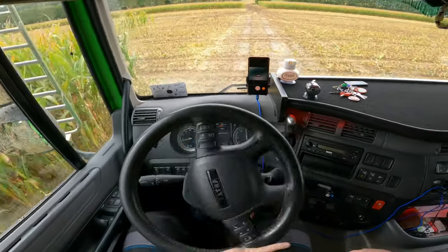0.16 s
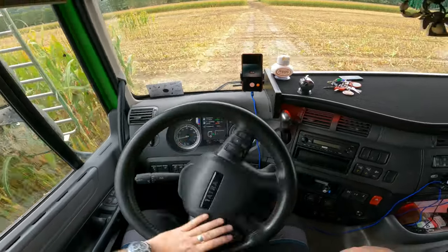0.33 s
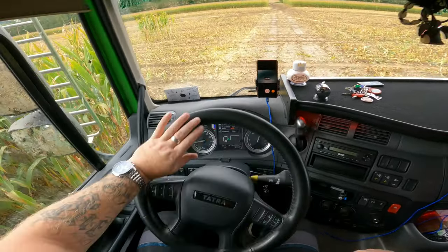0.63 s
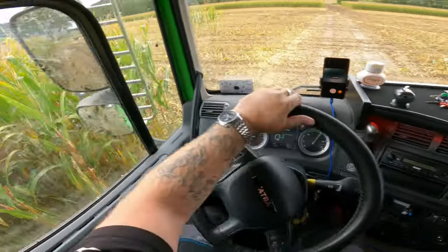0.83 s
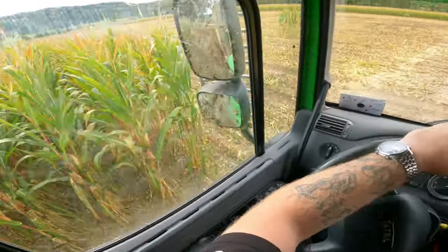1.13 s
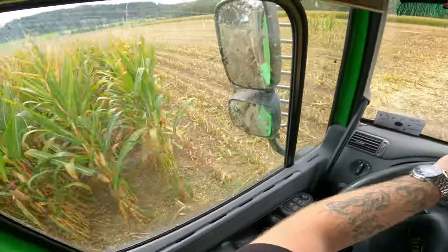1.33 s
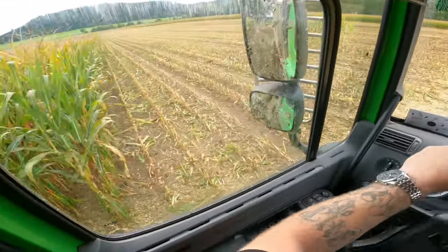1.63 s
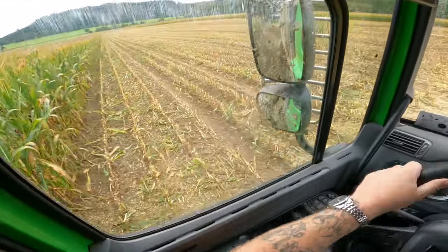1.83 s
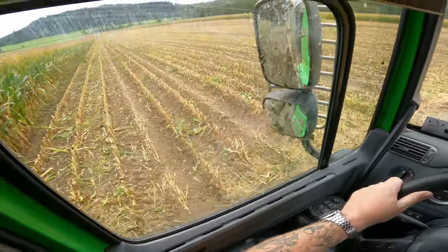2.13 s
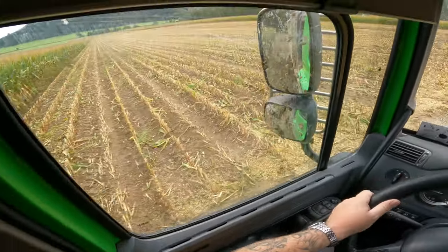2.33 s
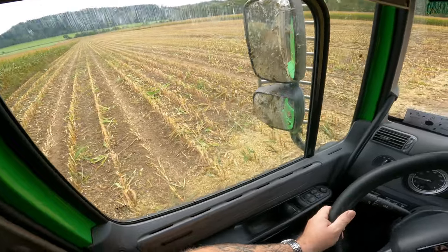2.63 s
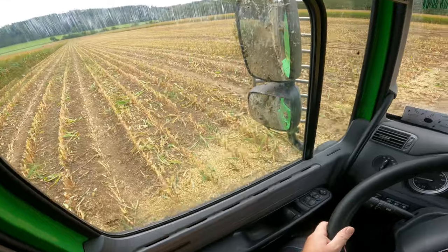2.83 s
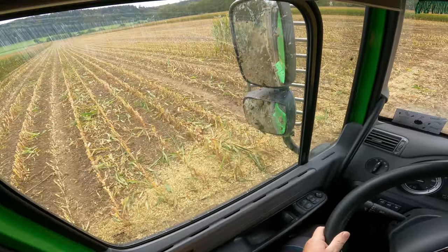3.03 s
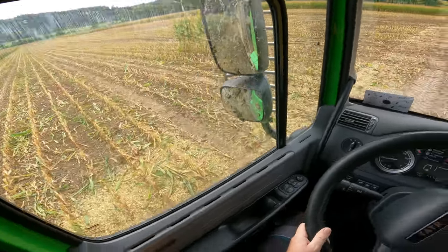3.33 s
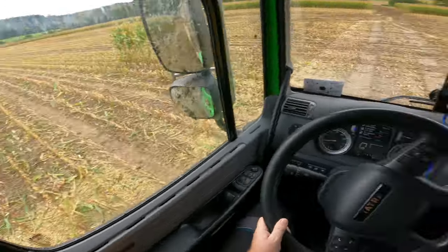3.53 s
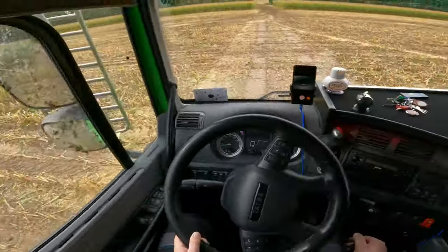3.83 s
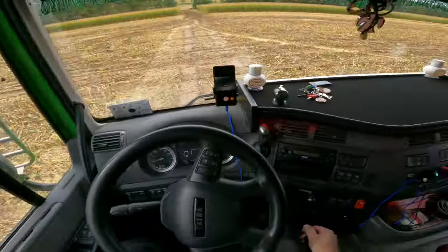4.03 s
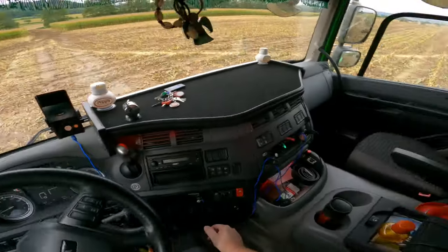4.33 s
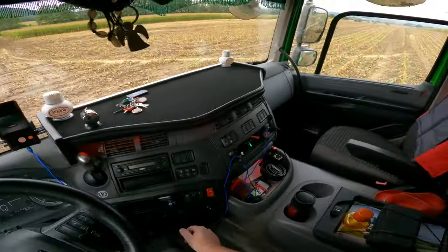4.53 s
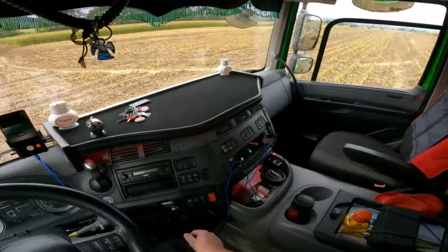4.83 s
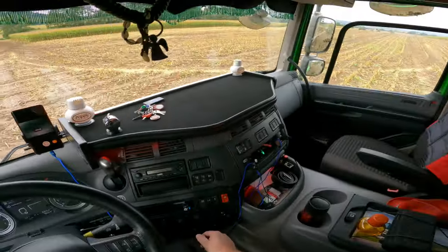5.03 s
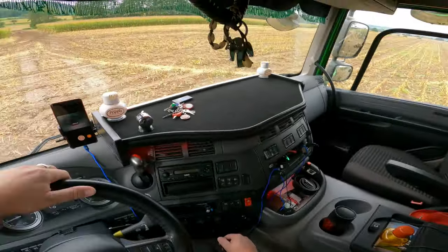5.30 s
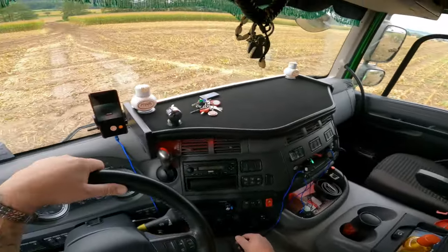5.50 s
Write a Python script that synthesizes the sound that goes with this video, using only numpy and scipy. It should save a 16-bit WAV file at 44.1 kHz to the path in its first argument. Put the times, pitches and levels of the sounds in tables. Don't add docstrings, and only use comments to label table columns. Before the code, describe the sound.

Heard at the driver's head in a closed truck cab: a hard knock and air-valve snap, a short fading hiss, then a six-cylinder diesel climbing under load. Around two seconds it drops for a gear change, wavers with thuds and knocks, and settles lower and softer. Field bumps boom through the cab while trim ticks and loose metal faintly rings.

```python
import sys
import numpy as np
from scipy import signal
from scipy.fft import rfft, irfft, next_fast_len
from scipy.io import wavfile
from scipy.ndimage import uniform_filter1d, minimum_filter1d

SR = 44100
rng = np.random.default_rng(int(sys.argv[2]) if len(sys.argv) > 2 else 0)


def boost(x):
    u = np.asarray(x, float) / 20
    return 10 ** u


def to_wav(sig):
    pcm = np.clip(np.atleast_2d(sig), -1, 1) * 32767
    pcm = np.round(pcm).astype(np.int16)
    wavfile.write(sys.argv[1], SR, pcm.T)


N = 249606

# t/s, firings per second [1/s]
SPEED = [(0, 67), (.35, 69), (.55, 78), (.75, 82), (1.3, 87.8), (1.6, 89.3), (1.87, 93.2), (2.1, 92.8),
         (2.3, 67), (2.75, 64), (3.0, 57), (3.3, 68.5), (3.65, 63.5), (3.95, 67.5), (4.15, 58),
         (4.75, 73.5), (5.3, 75.5), (5.66, 80)]
# t/s, level under full pull/dB
LOAD = [(0, -8.5), (.3, -8.5), (.6, -10.5), (.9, -10), (1.3, -6), (1.95, -6), (2.1, -8), (2.25, -15.5),
        (2.8, -13), (3.9, -19), (4.2, -20.5), (4.55, -18.5), (4.72, -17.5), (5.66, -20)]
# t/s, level/dB
TRAVEL = [(0, 1), (.9, -0.1), (1.32, -2), (1.53, -1), (2.0, 1), (2.22, -1), (2.33, -4.5), (2.57, -4.5),
          (2.75, -9), (3.17, -6.5), (3.4, -6), (3.86, -5), (4.24, -3), (4.6, -0.5), (5.28, -3),
          (5.66, -0.5)]
ORDERS = [2, 4, 5, 7, 8, 9, 10, 11, 12, 13, 14, 15, 16, 17, 18, 19, 20, 22, 24, 26, 28, 32, 34, 36, 40, 42]
ORDER_LEVELS = [-31.5, -38.5, -37, -40.5, -34, -37, -37.5, -33, -32.5, -48.5, -33, -42, -32, -41.5, -36,
                -40.5, -43.5, -39.5, -49, -41, -51.5, -47.5, -45.5, -50.5, -46.5, -50.5]
# f/Hz, width/Hz, lift/dB
PANELS = [(73.4, 18, 11.5), (110, 9.8, 12), (135.8, 1, 6), (150.6, 11, 7.5), (168.3, 12, 9),
          (209.4, 15, 9.5), (260, 30, 9)]
# t/s, multiple [1], peak level/dB, half length/s
SINGING_ORDERS = [(0.63, 8, -26, 0.16), (0.71, 36, -41.5, .2), (0.68, 18, -37.5, 0.29),
                  (1.03, 12, -34, 0.11), (1.36, 14, -29.5, 0.37), (1.6, 18, -36, 0.26),
                  (1.87, 10, -31, 0.36), (2.1, 26, -41, 0.2), (2.45, 15, -26.5, 0.1), (3.3, 11, -34, 0.23),
                  (4.4, 11, -38.5, 0.049), (3.4, 8, -26, 0.11), (4.36, 10, -25.5, 0.071),
                  (4.6, 10, -33.5, 0.076), (4.547, 28, -36, 0.089), (5.9, 28, -41.5, 0.19),
                  (5.303, 22, -42, 0.098), (5.35, 9, -33.5, 0.09), (.75, 26, -38, 0.13),
                  (2.42, 18, -32, 0.082), (2.34, 10, -32, 0.084), (4.75, 20, -41, 0.09),
                  (5.38, 32, -39.5, 0.085), (1.78, 7, -27, 0.11), (1.65, 16, -38.5, .25),
                  (1.1, 15, -32.5, 0.27), (1.3, 18, -33.5, .2), (1.5, 10, -34, 0.17), (1.96, 14, -35, 0.17),
                  (2.2, 17, -35.5, .12)]
# t/s, peak level/dB, half length/s
DRIVELINE_SURGES = [(.1, -17, 0.15), (.85, -17, 0.12), (1.15, -17.5, 0.22), (1.56, -20.5, 0.13),
                    (1.94, -22, 0.045), (2.35, -19, 0.025), (2.65, -13, 0.14), (2.86, -22.5, 0.074),
                    (3.07, -28, 0.032), (3.15, -19.5, 0.018), (3.3, -25.5, 0.026), (3.55, -19, 0.17),
                    (3.84, -16.5, 0.11), (4.07, -39, 0.02), (4.29, -20, 0.081), (4.68, -22.5, 0.16),
                    (4.97, -21.5, 0.033), (5.2, -26.5, 0.12), (5.49, -18.5, 0.03), (5.6, -18.5, 0.027)]
# t/s, peak level/dB, half length/s
ROAR_FLARES = [
    (2.12, -26, 0.24),
    (2.36, -32, 0.062),
    (2.58, -31, 0.1),
    (2.88, -29, 0.02),
    (4.15, -32.5, 0.1),
    (5.55, -45, 0.047),
]
# f/Hz, level/dB per Hz
ROAR_SPECTRUM = [(76, -1.5), (130, -3.5), (162, 0.5), (235, -6), (330, -15), (430, -52), (730, -120)]
# f/Hz, level/dB per Hz
BLOCK_SPECTRUM = [(160, -21.5), (280, -4), (300, -8), (387, -4.5), (437, -10.5), (482, -7.5), (578, -13),
                  (623, -14.5), (672, -15), (805, -21), (880, -22), (985, -16), (1030, -19), (1200, -22),
                  (1325, -21), (1380, -27.5), (1560, -29), (1700, -35), (2210, -48.5), (3740, -120)]
# f/Hz, level/dB per Hz
STALKS_SPECTRUM = [(1100, -22), (1450, -1), (1740, -2.5), (2040, -4), (2540, -8.5), (3500, -12),
                   (4780, -14.5), (6200, -19.5), (7500, -23.5), (9500, -49)]
# f/Hz, level/dB per Hz
FINE_SPECTRUM = [(5500, -25), (7000, -5.5), (8500, -0.5), (11400, -9), (13000, -10.5), (14200, -28.5),
                 (15200, -54)]
# t/s, heave level/dB, boom level/dB
JOLTS = [(0, -17, -29.5), (0.649, -29, -32), (.88, -35, -31), (1.21, -42, -30), (1.48, -34.5, -32.5),
         (2.199, -42.5, -24), (2.44, -25.5, -27), (2.701, -34, -36), (3.0, -33, -37), (3.3, -35, -34),
         (3.571, -38, -31), (4.02, -26, -35.5), (4.15, -32.5, -31.5), (4.34, -54, -32), (4.52, -31, -34.5),
         (4.789, -32.5, -35), (4.95, -49, -38), (5.39, -56, -30.5), (5.56, -25, -38.5)]
# f/Hz, level/dB per Hz
HEAVE_SPECTRUM = [(10, -30), (17, -10), (22, -3), (27, 0), (32, -5), (42, -14), (52, -40)]
# f/Hz, level/dB per Hz
BOOM_SPECTRUM = [(34, -35.5), (44, -2.5), (54, -19), (66, 5.5), (80, -9.5), (100, -1.5), (115, -5.5),
                 (135, -10), (160, -48.5)]
# f/Hz, level/dB per Hz
HUM_SPECTRUM = [(200, -40), (228, -6), (238, 0), (250, -6), (285, -40)]
# f/Hz, level/dB per Hz
LEAK_SPECTRUM = [(1500, -36), (2000, 0), (2600, -9), (2950, 5), (4500, -8), (8000, -18.5), (12000, -25.5),
                 (14500, -44)]
# f/Hz, level/dB per Hz
JET_SPECTRUM = [(1200, -47), (1750, -15), (2150, 5.5), (2600, -16), (3000, -2), (3550, 0.5), (3950, -7.5),
                (4300, -5.5), (4900, -17), (5850, -6.5), (8000, -16.5), (11000, -27.5), (12300, -11.5),
                (15500, -48)]
# f/Hz, level/dB per Hz
SNAP_SPECTRUM = [(300, -40), (500, 3), (900, -3), (1370, -11), (1820, -31), (3300, -8), (4740, -10.5),
                 (5270, -16.5), (7350, -15), (9000, -31), (12300, -31.5), (16500, -51)]
# t/s, peak level/dB, f/Hz, t60/s, left-right level/dB
VALVE_MODES = [
    (.1012, -23, 1315, .06, 0),
    (.1012, -27, 2990, .06, 1.5),
    (.1012, -27, 3340, .07, 0),
    (.1012, -22, 4800, .08, 1.5),
    (.1012, -31, 6360, .05, 2.5),
    (.1012, -31, 7270, .07, 2),
    (.1012, -38, 8140, 0.059, 1),
    (.115, -29, 3650, .08, 1.5),
]
# f/Hz, width/Hz, level/dB, fall/dB per s
WHISTLES = [(1985, 83, -45, 62), (2190, 56, -43.5, 75), (2320, 46, -55, 96.5), (3230, 36, -56, 100.5),
            (3400, 67, -42, 100), (3650, 66, -42, 96), (4050, 50, -47, 85), (4280, 50, -46, 80),
            (5840, 66, -51.5, 100), (12160, 300, -70, 72), (2980, 60, -56, 30.5), (4730, 73, -55, 35.5),
            (2350, 200, -50, 63), (3740, 300, -53.5, 55.5)]
# t/s, peak level/dB, t60/s
THUDS = [
    (0.806, -38, 0.061),
    (2.604, -33, 0.51),
    (2.643, -37.5, 0.19),
    (2.698, -29.5, 0.097),
    (2.713, -36, 0.15),
    (2.861, -35, 0.2),
    (2.885, -33, 0.086),
    (4.002, -38, 0.049),
    (4.141, -55, 0.09),
    (5.503, -51, 0.045),
]
# f/Hz, level/dB per Hz
THUD_SPECTRUM = [(180, -43), (300, 7), (684, -7), (925, -6), (1060, -12), (1270, -15.5), (2700, -29.5),
                 (3760, -31), (8000, -48.5), (10400, -84.5), (17600, -120)]
# t/s, peak level/dB, f/Hz, t60/s, left-right level/dB
KNOCKS = [(0.093, -16.5, 586, 0.023, 0.5), (1.1, -20.5, 480, .04, 6), (.727, -26, 554, .04, 1.5),
          (.752, -28.5, 740, .2, 4), (2.4, -29.5, 920, 0.08, -1), (2.656, -29.5, 840, 0.22, 0),
          (2.6, -40.5, 790, .05, 1.5), (2.606, -40.5, 2300, .05, 1.5), (2.622, -36.5, 1100, .1, 0),
          (2.653, -37, 1100, .04, 1.5), (2.876, -35, 654, .05, 1.5), (2.883, -33, 860, 0.057, 1.5),
          (3.4135, -34.5, 2900, .02, 1), (3.4135, -32.5, 2300, .02, 1.5), (3.543, -46, 2300, .05, -1),
          (5.36, -42.5, 1540, .6, 1.5), (3.1868, -50.5, 2630, 0.06, 5), (3.2068, -54, 2740, 0.04, 0),
          (3.147, -51, 2670, .05, 4), (3.2905, -46, 2300, .025, -1), (3.4135, -25, 1800, .022, 3),
          (3.603, -31.5, 1100, 0.063, -2), (3.742, -25, 478, .06, 0), (4.196, -27, 333, 0.12, -1),
          (2.7, -41, 1530, .05, 3), (3.1, -46.5, 2000, 0.036, -4), (2.96, -39, 1220, 0.07, -1),
          (2.4, -31, 640, 0.16, 0.5), (2.705, -33, 565, 0.11, 1.1), (2.699, -32, 940, .08, -1),
          (3.05, -28, 444, 0.14, 3), (3.3, -38.5, 3000, 0.054, 2.5), (4.143, -30.5, 480, 0.2, 4),
          (5.1, -35, 450, 0.19, 1.1), (6.1, -29, 520, 0.046, 1.1)]
# t/s, peak level/dB, f/Hz, t60/s, left-right level/dB
BUCKLE_TAPS = [
    (1.0526, -32.5, 5200, .09, 4),
    (1.512, -39, 5450, .09, 4),
    (2.5272, -35, 5280, .11, -3.5),
    (3.3797, -31.5, 5150, .09, -4),
    (3.7666, -49, 6460, .06, 2),
    (4.9985, -33, 5280, .13, 6),
]
# t/s, low third peak/dB, middle against it/dB, high against it/dB, left-right level/dB
TICKS = [(1.985, -41, -6, -36, 1), (2.1816, -40.5, -13, -21, 2), (2.2245, -44.5, -12, -20, 0.5),
         (2.3994, -46, -8, -22, 7), (2.9557, -57, -19, -29, 3), (2.9777, -55, -1, -11, 2.5),
         (3.029, -48.5, -16, -15, 8), (3.1467, -44, -14, -34, -6), (3.3365, -41.5, -5.5, -24, -5),
         (3.4130, -33.5, -11, -25, 5.5), (3.514, -45, -16, -18, -0.5), (3.5299, -47, -4, 0.5, 8),
         (3.5575, -49.5, 3, -8, 7), (3.5967, -41.5, -11, -30.5, -4), (3.7924, -44, -1.5, -35, 5),
         (3.9033, -50.5, 1.5, -14.5, -4), (4.002, -31, -5, -22, 3.5), (4.3388, -51, 2.5, -19, 3),
         (2.5842, -50, -5, -27, 2), (3.048, -51, -2, -17.5, -5), (3.472, -58, 2, -2.5, 7),
         (3.605, -44.5, -5, -17, 4), (3.719, -55.5, 7, -15, 2), (3.882, -53, -5, -27, 0),
         (3.951, -46, 2, -21, 1.5), (4.019, -40, -10, -24, 1.5), (1.054, -49.5, 5.5, -13, 7),
         (1.5555, -51, -1, -20, 1.5), (2.1382, -47, -1, -19, 2), (2.4445, -57, -5, -20, 1.5),
         (2.8196, -55, -1.5, -15, 1.5), (3.0002, -51.5, -0.5, -15, 1.5), (3.0976, -46.5, -10, -25, 1.5),
         (4.6185, -48.5, -2, -22, 0), (4.86, -49, -2, -20, 1), (4.9792, -48, -2, -16.5, 1.5),
         (5.1713, -46, -3, -14, 0), (3.385, -56, 5, -18, 3), (3.428, -48, -4, -22, 0)]
# lower f/Hz, upper f/Hz
TICK_BANDS = [(1300, 3500), (3500, 7000), (7000, 11500)]
# t/s, peak level/dB, f/Hz, t60/s, left-right level/dB
JINGLES = [
    (1.0695, -57, 12100, 0.074, 4.2),
    (1.1318, -60, 12000, 0.032, 2.5),
    (3.9399, -78, 11830, 0.037, 0.5),
    (4.1798, -53, 11660, 0.026, 6.4),
    (4.3221, -48.5, 11950, 0.035, 3.4),
    (4.3645, -73.5, 10600, 0.062, 6.3),
    (4.4126, -62, 11950, 0.063, 2.2),
]
# t/s, peak level/dB, f/Hz, t60/s, left-right level/dB
METAL_RINGS = [(3.392, -52, 3480, .1, 1.5), (3.44, -54, 3530, .3, 3), (3.47, -54, 3600, .15, 3),
               (3.472, -59, 6500, .1, 3), (3.84, -53, 4500, .15, 1.5), (3.94, -56, 6540, .05, 3),
               (4.177, -54, 6600, .12, 1.5), (4.437, -53, 2980, .06, 4), (4.451, -49, 2980, .07, 4),
               (4.93, -53, 5630, .12, 3), (5.003, -48, 5230, .2, 0)]
# t/s, rms level/dB, half length/s
SWISHES = [(0.882, -61.5, 0.2), (1.644, -59.5, 0.049), (1.995, -63.5, 0.065), (2.86, -59, 0.012),
           (3.946, -63.5, 0.15), (5.0, -55, 0.026), (4.78, -64, 0.046), (5.15, -66, 0.043),
           (5.235, -60, 0.066), (4.02, -61, 0.009), (5.426, -56, 0.063)]
# f/Hz, level/dB per Hz
SWISH_SPECTRUM = [(2500, -13), (4000, 1), (6000, -1.5), (8500, -11), (11500, -15), (13000, -19),
                  (15300, -46)]
# f/Hz, side minus mid level/dB
SPREAD = [(60, -34), (110, -27), (200, -18.5), (370, -15.5), (690, -10.5), (1270, -7.5), (2340, -4.5),
          (4320, -7), (7950, -6.5), (14600, -4)]
# f/Hz, left-right level/dB
TILT = [(60, 0), (110, 0.5), (200, -1), (370, 0.5), (690, 2), (1270, 2.5), (2340, 2.0), (4320, 0),
        (7950, 2.5), (14600, -2)]

SNAP_S = .1008


def engine():
    per_s, = in_time(SPEED)
    load_db, = in_time(LOAD)
    cycle = 2 * np.pi * np.cumsum(per_s) / SR / 6
    tones = firing_tones(cycle) + cycle_orders(cycle, per_s, load_db)
    roar_gain = boost(-26 + 0.59 * load_db) + swells(ROAR_FLARES)
    return np.sqrt(2) * tones + roar_gain * coloured(ROAR_SPECTRUM) + clatter(cycle, load_db)


def firing_tones(cycle):
    from_s, to_s, edge_s = 4.755, 5.35, 0.11
    lugging = rise(from_s - edge_s, edge_s) * (1 - rise(to_s, edge_s))
    firing = uniform_filter1d(boost(-48.5) + swells(DRIVELINE_SURGES), size=64)
    half = boost(-41) + boost(-23) * lugging ** 2
    return firing * np.sin(6 * cycle + .35 * drift(5)) + half * np.sin(3 * cycle)


def cycle_orders(cycle, per_s, load_db):
    tones = np.zeros(N)
    for k, (order, level_db) in enumerate(zip(ORDERS, ORDER_LEVELS)):
        hz = order * per_s[::64] / 6
        lift_db = sum(db / (1 + (2 * (hz - centre) / width) ** 2) for centre, width, db in PANELS)
        gain = boost(level_db + load_db + np.repeat(lift_db, 64)[:N] + 1.5 * drift(3))
        for s, multiple, db, half_s in SINGING_ORDERS:
            if round(multiple) == order:
                gain = gain + swells([(s, db, half_s)])
        tones = tones + gain * np.sin(order * cycle + k * k + .25 * drift(3))
    return tones


def clatter(cycle, load_db):
    travel_db, = in_time(TRAVEL)
    uneven = .12 * np.cos(cycle) + .12 * np.cos(2 * cycle + 1)
    rap = 1 + boost(load_db / 2) * (.28 * np.cos(6 * cycle) + uneven)
    flutter, broken = drift(22), gaps(16, 7, .014)
    block = coloured(BLOCK_SPECTRUM)
    floor_pan = signal.sosfiltfilt(signal.butter(3, 497, fs=SR, output="sos"), block)
    block = block + (boost(0.5 + 0.31 * travel_db + 0.63 * drift(1.4)) - 1) * floor_pan
    rapped = boost(-33.5 + travel_db + .5 * flutter) * block * rap
    rustle_gain = boost(-51 + travel_db + 0.26 * flutter + 0.29 * drift(40))
    rustle = rustle_gain * coloured(STALKS_SPECTRUM) * rap * broken
    fine_gain = boost(-74 + travel_db + 1.2 * flutter + 0.6 * drift(40))
    return rapped + rustle + fine_gain * coloured(FINE_SPECTRUM) * broken


def ground():
    t = np.arange(N) / SR
    heave = boost(-38) + swells([(s, db, 0.085) for s, db, _ in JOLTS])
    boom = boost(-28) + swells([(s, db, 0.066) for s, _, db in JOLTS])
    boom = boom * boost(0.45 * drift(22))
    hum_s, hum_rise_s, hum_db, hum_fall_db_s, hum_rest_db = 3.97, 0.106, -34, 9, -40
    hum_level_db = np.maximum(hum_db - hum_fall_db_s * (t - hum_s), hum_rest_db)
    hum = boost(hum_level_db) * rise(hum_s, hum_rise_s) * coloured(HUM_SPECTRUM)
    note = swells([(0.449, -17, 0.1)]) * np.sqrt(2) * np.sin(2 * np.pi * 69.6 * t)
    return note + heave * coloured(HEAVE_SPECTRUM) + boom * coloured(BOOM_SPECTRUM) + hum


def valve():
    since = np.arange(N) / SR - SNAP_S
    leak = (since < 0) * boost(-45) * rise(0.056, 0.0083) * coloured(LEAK_SPECTRUM)
    jet = (since >= 0) * boost(-43 - 78 * since) * coloured(JET_SPECTRUM)
    out = (leak + jet) * boost(.6 * drift(40))
    t = np.arange(4000) / SR
    attack = np.minimum(t / .0006, 1)
    dying = boost(-60 * t / 0.069) + boost(-7.0 - 60 * t / 0.25)
    add(out, SNAP_S, boost(-27) * dying * attack * coloured(SNAP_SPECTRUM, size=len(t)))
    return out


def whistles():
    since = np.arange(22000) / SR
    out = np.zeros((2, N))
    for hz, width, db, fall_db in WHISTLES:
        r = np.exp(-np.pi * width / SR)
        air = rng.standard_normal((2, len(since)))
        pair = air[0] + 0.51 * air[1] * [[1], [-1]]
        note = signal.lfilter([1, 0, -1], [1, -2 * r * np.cos(2 * np.pi * hz / SR), r * r], pair)
        add(out, SNAP_S, boost(db - fall_db * since) * note / note.std())
    return out


def thuds():
    out, t = np.zeros((2, N)), np.arange(12000) / SR
    for s, peak_db, t60 in THUDS:
        gain = boost(peak_db + 3.5 - 60 * t / t60) * np.minimum(t / 0.0033, 1)
        add(out, s, gain * coloured(THUD_SPECTRUM, size=len(t)))
    return out


def struck(rows, width, skirt_db, tail_db):
    out, t = np.zeros((2, N)), np.arange(4000) / SR
    for s, peak_db, hz, t60, pan_db in rows:
        skirt = burst(hz * .75, hz * 1.7, t60 / 2)
        head = boost(-200 * t / t60) * np.minimum(t / .0012, 1)
        head = head * np.sin(2 * np.pi * hz * t) * np.cos(np.pi * hz * (width - 1) * t)
        tail = burst(hz / width, hz * width, t60, order=2)
        ring = (1 - boost(tail_db)) * head + boost(tail_db) * tail
        add(out, s, boost(peak_db) * (ring + boost(skirt_db) * skirt) * pan(pan_db))
    return out


def ticks():
    out = np.zeros((2, N))
    for s, peak_db, middle_db, high_db, pan_db in TICKS:
        thirds = zip((0, middle_db, high_db), TICK_BANDS)
        sound = sum(boost(peak_db + db) * burst(*band, .03) for db, band in thirds)
        add(out, s, sound * pan(pan_db))
    return out


def swishes():
    return coloured(SWISH_SPECTRUM) * swells(SWISHES)


def in_time(rows):
    s, *columns = np.transpose(rows)
    return [np.interp(np.arange(N) / SR, s, c) for c in columns]


def at_hz(points, hz):
    table_hz, level_db = np.transpose(points)
    return np.interp(np.log(hz), np.log(table_hz), level_db)


def drift(rate):
    r = np.exp(-80 * np.pi * rate / SR)
    slow = signal.lfilter([1], [1, -2 * r, r * r], rng.standard_normal(N // 40 + 2002))[2000:]
    return np.interp(np.arange(N) / 40, np.arange(len(slow)), slow / slow.std())


def coloured(spectrum, size=N):
    padded = next_fast_len(size)
    hz = np.maximum(np.arange(padded // 2 + 1) * SR / padded, 1)
    ripple = np.interp(hz / 28, np.arange(800), rng.standard_normal(800)) * np.clip(hz / 300 - .5, 0, 1)
    inside = (hz > spectrum[0][0]) * (hz < spectrum[-1][0])
    shape = boost(at_hz(spectrum, hz) + 1.1 * ripple) * inside
    mid, side = rfft(rng.standard_normal((2, padded))) * shape
    side = side * boost(at_hz(SPREAD, hz))
    tilt = boost(at_hz(TILT, hz) / 2)
    pair = irfft(np.array([(mid + side) * tilt, (mid - side) / tilt]), padded)[:, :size]
    return pair / pair.mean(axis=0).std()


def burst(low_hz, high_hz, t60, order=3):
    t = np.arange(4000) / SR
    puff = rng.standard_normal(len(t)) * boost(-60 * t / max(t60, .004))
    puff *= np.minimum(t / .001, 1)
    band = signal.butter(order, [low_hz, min(high_hz, 18000)], "band", fs=SR, output="sos")
    puff = signal.sosfilt(band, puff)
    return puff / np.abs(puff).max()


def gaps(per_s, depth_db, length):
    starts = 1. * (rng.random(N) < per_s / SR)
    breaks = signal.fftconvolve(starts, np.hanning(round(length * SR)), "same")
    return boost(-depth_db * np.minimum(breaks, 1))


def swells(rows):
    t = np.arange(0, N + 32, 32) / SR
    gain = sum(boost(db) * np.exp(-((t - s) / half_s) ** 2) for s, db, half_s in rows)
    return np.repeat(gain, 32)[:N]


def rise(s, length):
    return np.clip((np.arange(N) / SR - s) / length, 0, 1)


def pan(pan_db):
    return boost([[pan_db / 2], [-pan_db / 2]])


def add(out, s, sound):
    i = round(s * SR)
    out[:, i:i + sound.shape[1]] += sound[:, :N - i]


def scene():
    air = valve() + struck(VALVE_MODES, 1.04, -21, tail_db=-8.5) + whistles()
    knocks = struck(KNOCKS, 1.07, -14, tail_db=-6)
    buckle = struck(BUCKLE_TAPS, 1.12, -14, tail_db=-10)
    trinkets = struck(JINGLES, 1.04, -10.5, tail_db=-5.5)
    metal = struck(METAL_RINGS, 1.05, -23.5, tail_db=0.5)
    return engine() + ground() + air + thuds() + knocks + buckle + ticks() + trinkets + metal + swishes()


def roll_off(x):
    return signal.sosfilt(signal.butter(12, 15240, fs=SR, output="sos"), x)


def record(dry):
    ceiling, release_db_s = .43, 50.5
    over_db = np.maximum(20 * np.log10(np.abs(dry).max(axis=0) / ceiling + 1e-9), 0)
    ramp = release_db_s * np.arange(N) / SR
    held = np.maximum.accumulate(over_db + ramp) - ramp
    duck = uniform_filter1d(-minimum_filter1d(-held, size=129), size=129)
    return roll_off(dry * boost(-duck))


dry = scene()
out = record(dry)
to_wav(out)
```